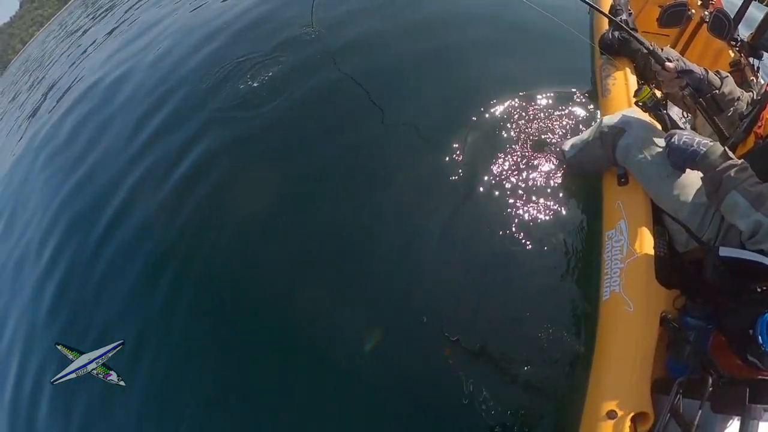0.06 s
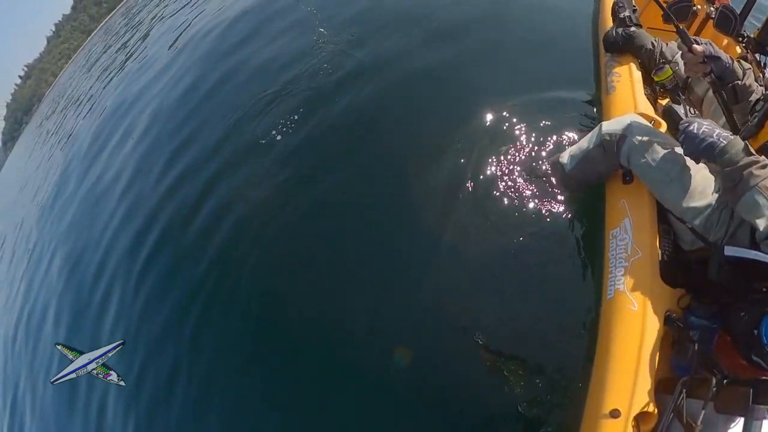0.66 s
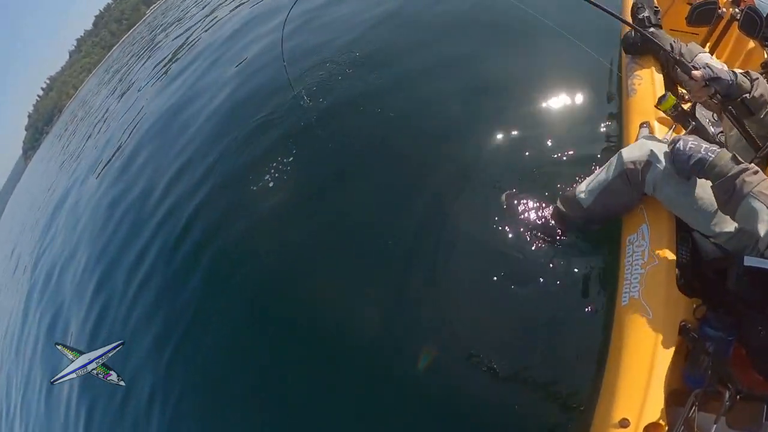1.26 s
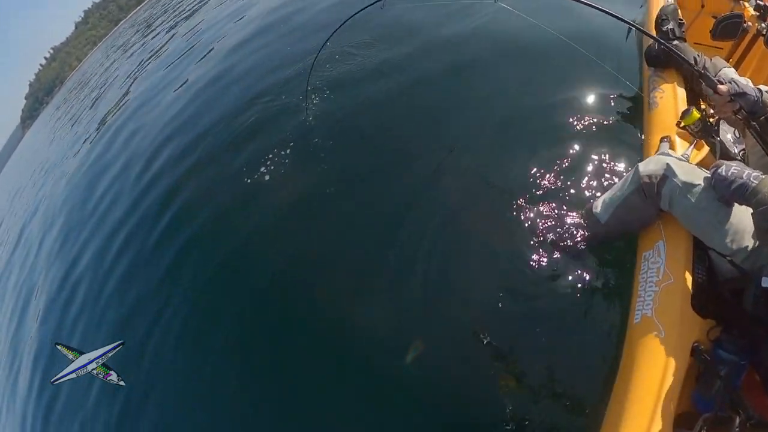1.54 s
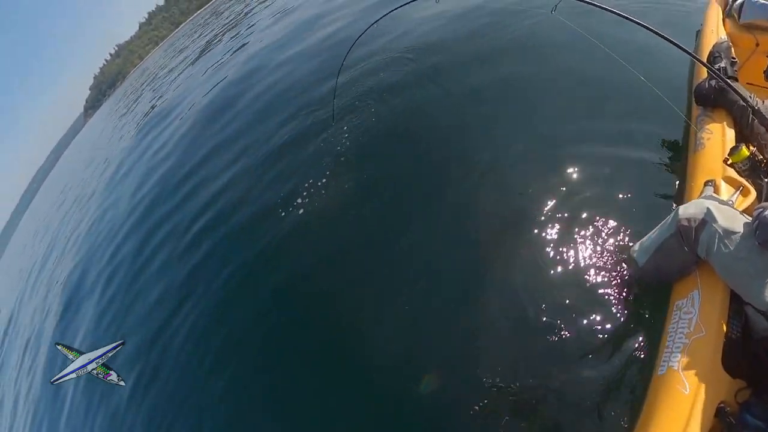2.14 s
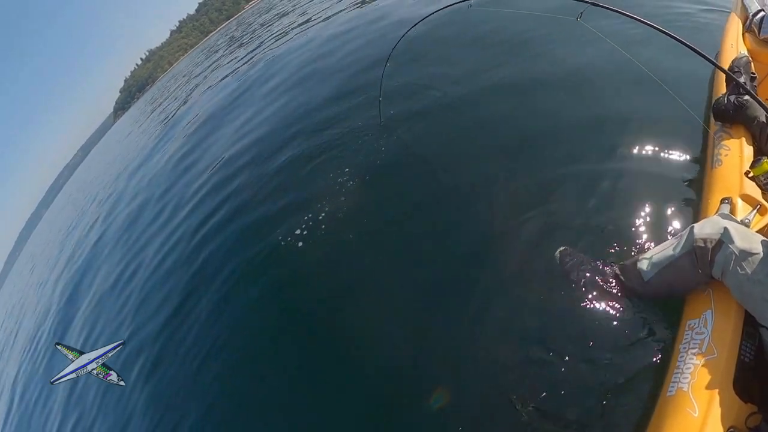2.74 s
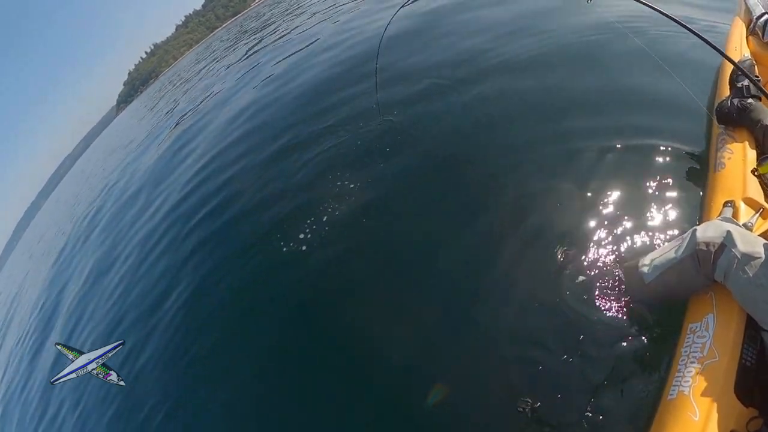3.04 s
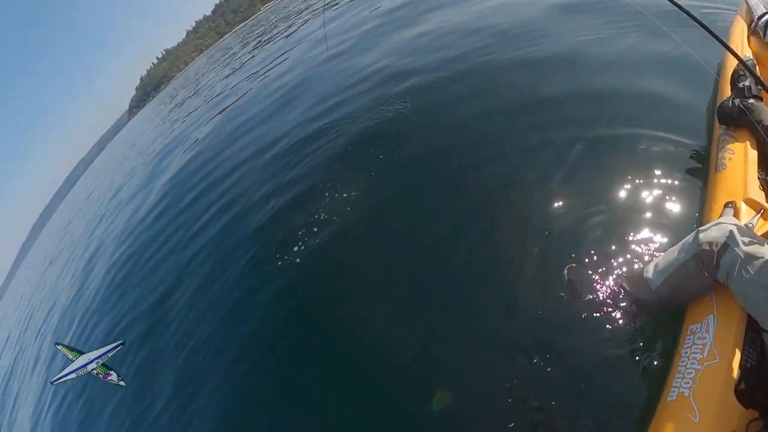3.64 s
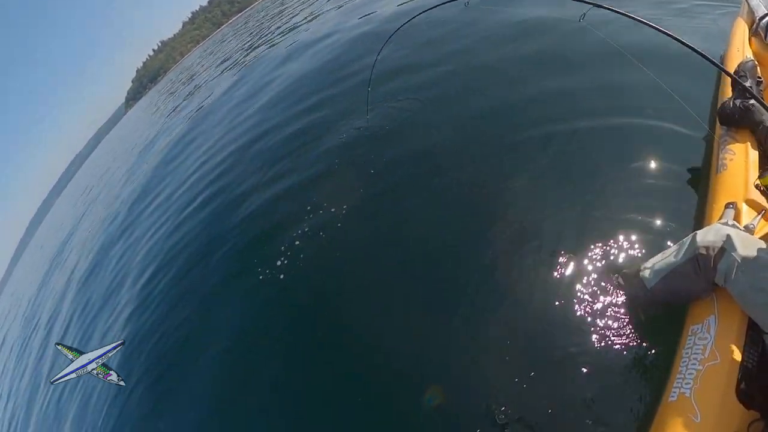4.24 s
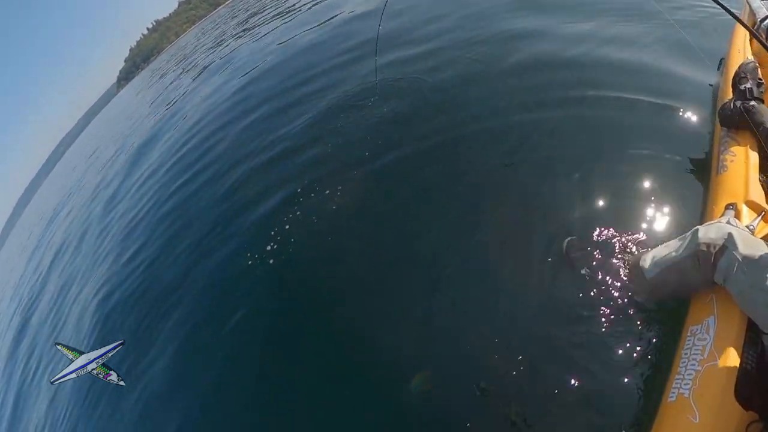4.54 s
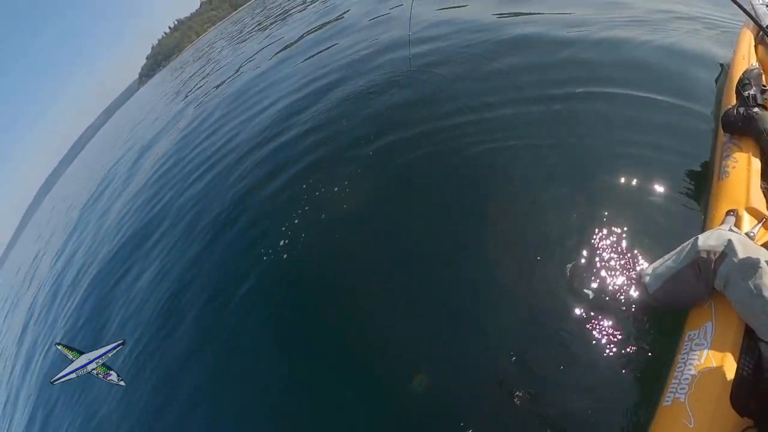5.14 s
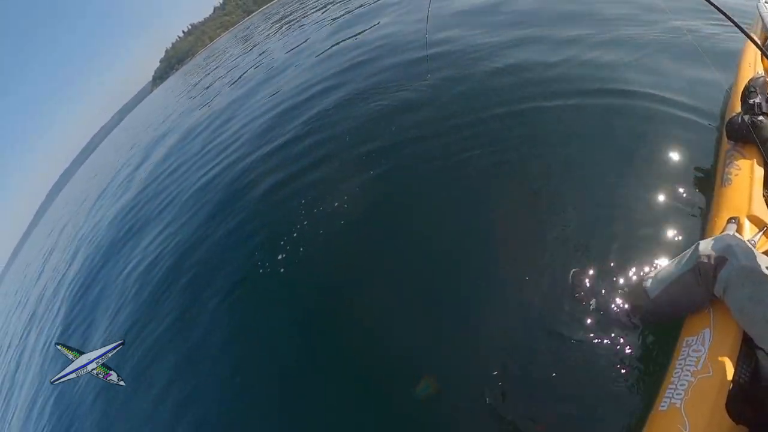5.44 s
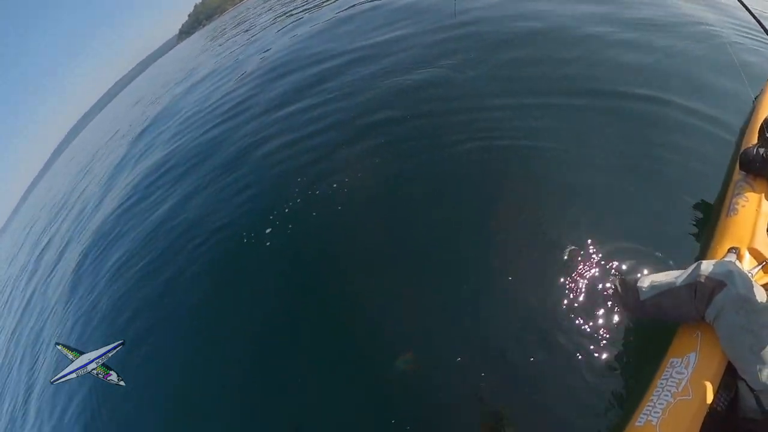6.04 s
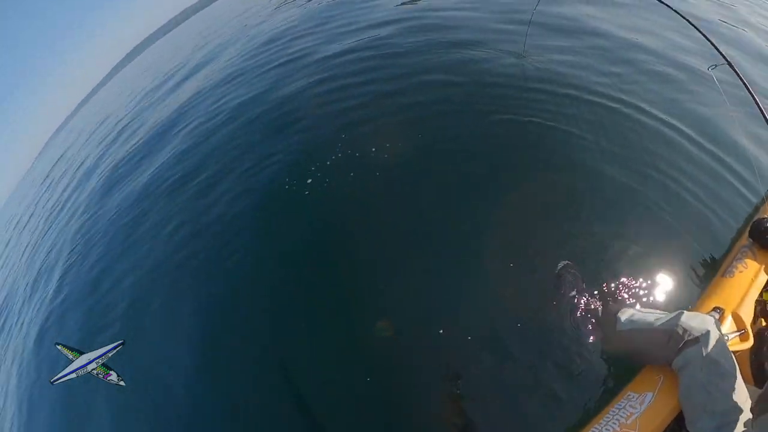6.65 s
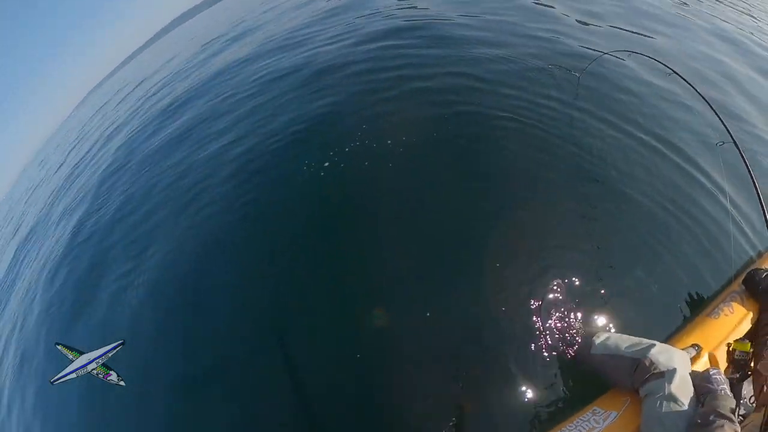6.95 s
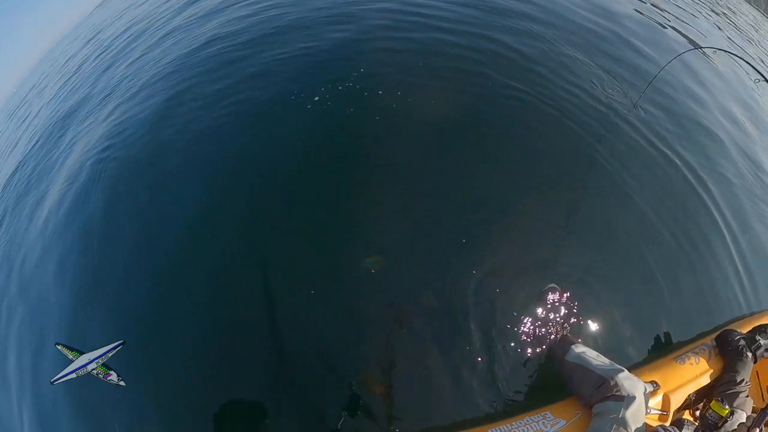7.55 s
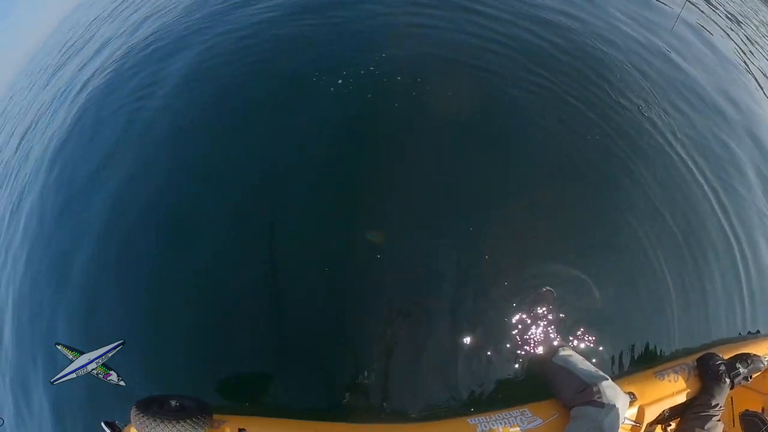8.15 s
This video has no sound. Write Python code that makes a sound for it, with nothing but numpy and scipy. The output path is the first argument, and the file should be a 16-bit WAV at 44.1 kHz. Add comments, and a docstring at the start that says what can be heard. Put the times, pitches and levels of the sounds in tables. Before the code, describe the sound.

A fishing reel's drag ratchets close by in a short tug during the first 0.4 seconds. A long run of bright metallic clicks follows from 0.9 to 3.1 seconds, rising to a buzz and slowing unevenly. After a few ticks it runs again from 3.5 to 5.4 seconds, fastest around 4, with a faint whine of strained line. Sparse ticks fill the pause before a last run from 6.7 to 7.9 seconds and a single click just after 8.

Water plops and laps against the plastic kayak around 1.3 and 7 seconds, and low gulps sound under it now and then. The hollow hull knocks dully, strongest at 1.9 seconds and softer at 6.9. A waterproof suit rustles lightly. Throughout there is a steady open-air rumble and a faint drone like a distant boat engine, with light gusts near 2 and 4 seconds and no echo.

```python
"""A plastic kayak on calm open water, a fish on the line. The reel's drag gives line in runs: a pawl
snaps over teeth, ringing spool, housing and frame, while reel and taut line whine under load.
A waterproof suit rustles. Waves wash the hollow hull, air pockets gulp under it, drops plop
and dull knocks ring its modes. Under it all: open-air rumble, a breeze and a low drone
like a far boat engine."""
import sys
import numpy as np
from scipy import signal
from scipy.fft import rfft, irfft, next_fast_len
from scipy.io import wavfile

SR = 44100
rng = np.random.default_rng(int(sys.argv[2]) if len(sys.argv) > 2 else 0)


def to_wav(sig):
    """Store sig (one row per channel, or 1-D mono) as 16-bit WAV at the path in sys.argv[1].

    Samples outside -1..1 are clipped; the rate is SR.
    """
    pcm = np.clip(np.atleast_2d(sig), -1, 1) * 32767
    pcm = np.round(pcm).astype(np.int16)
    wavfile.write(sys.argv[1], SR, pcm.T)  # frames by channels


N = 369983

# Table levels are relative within each source.
# open-air spectrum: freq_hz, level_db
AIR_SPECTRUM = [(20, -22.5), (38, -15), (65, 4.5), (120, 1.5), (160, -4), (240, -15.5), (350, -20),
                (550, -30.5), (900, -49.5), (1130, -33.5), (2200, -75), (6500, -51), (9000, -64.5),
                (15000, -84)]
# drone lines: pitch_hz, width_hz, level_db
DRONE_LINES = [(92.87, 2.34, -33.5), (180.8, 18, -56), (206.2, 16, -52.5), (268.1, 2.6, -54)]
# wind gusts: peak_s, rise_s, fall_s, level_db
GUSTS = [(2.0, 0.58, 0.63, -32), (4.1, 0.057, 0.28, -36)]
# waves along the hull: peak_s, rise_s, fall_s, level_db
WAVES = [(.93, 0.23, 0.15, -50), (1.72, 0.91, 0.77, -52.5), (6.9, 0.089, 0.087, -54),
         (7.2, 0.14, 0.13, -50.5)]
# drops: start_s, pitch_hz, level_db, fall_s, glide_octaves (per fall_s)
DRIPS = [(0.321, 2910, -36, 0.018, 0.37), (0.341, 2320, -35, 0.0095, 0.63),
         (0.472, 1640, -33.5, 0.012, -0.08), (0.474, 3090, -33.5, 0.0043, -0.73),
         (1.311, 2170, -22, 0.0074, -0.1), (1.314, 1110, -24.5, 0.0043, -0.13),
         (1.316, 365, -27, 0.047, .1), (1.332, 1540, -26, 0.029, -0.51), (1.349, 2710, -25.5, 0.0075, .4),
         (1.386, 2990, -28.5, 0.019, -1.21), (1.422, 1105, -26, 0.02, .5), (5.286, 1060, -39, 0.0175, 0.59),
         (6.813, 1020, -41, .04, 0.77), (6.914, 2600, -32, 0.011, 0.057), (7.038, 1485, -26, 0.013, 0.13),
         (7.177, 843, -46.5, 0.04, 0.43), (7.951, 2730, -32.5, 0.0066, 0.4)]
# air pockets under the hull: start_s, length_s, pitch_hz, level_db
GULPS = [(1.114, 0.057, 118.5, -18), (1.168, 0.15, 122.6, -20), (1.388, 0.086, 104, -22),
         (1.885, 0.044, 105, -10.5), (1.942, 0.076, 81.6, -15.5), (2.328, 0.04, 85, -13.5),
         (2.368, 0.094, 109, -20.5), (4.069, 0.1, 110.6, -22), (4.127, 0.122, 83, -21),
         (4.554, 0.067, 121.8, -23.5), (7.152, 0.21, 123.3, -17.5), (7.871, 0.04, 76, -17.5)]
# hull modes: freq_hz, level_db, t60_s
HULL_MODES = [(133.2, 4, 0.14), (177, -3, 0.39), (223, 4, 0.11), (292, -4.5, 0.094), (329, 2, 0.046),
              (535, -7.5, 0.18), (756, -10.5, 0.13)]
# blows on the hull: start_s, level_db, contact_cutoff_hz
KNOCKS = [(.15, -32, 610), (1.315, -37.5, 1500), (1.853, -17.5, 545), (1.8595, -20.5, 301),
          (1.8767, -22.5, 250), (6.878, -28.5, 696), (6.905, -37, 500)]
# fabric spectrum: freq_hz, level_db
FABRIC_SPECTRUM = [(300, -25), (750, -7), (1100, 6), (2000, 5.5), (3400, -1), (5200, -3), (7200, -5),
                   (8900, -20), (10800, -23.5), (13000, -32), (15500, -45)]
# arm and leg movements: peak_s, rise_s, fall_s, level_db
LIMB_STROKES = [(.15, .4, 1, -59.5), (.87, 0.076, 0.21, -41.5), (1.65, 0.98, 0.4, -51),
                (1.95, 0.043, 0.019, -49.5), (2.65, 0.65, 0.37, -58.5), (3.635, 0.083, 0.053, -47.5),
                (4.0, 0.21, 0.15, -50), (5.28, 1, 0.17, -57.5), (6.4, 0.073, 0.14, -53),
                (6.88, 0.16, 0.66, -52.5), (7.4, 0.72, 0.5, -60), (8.08, 0.044, 0.27, -53.5),
                (8.38, 0.043, .1, -51.5)]
# reel and line resonances: start_s, length_s, pitch_hz, width_hz, level_db
WHINES = [(0.031, 0.29, 1890, 160, -52.5), (1.519, 0.38, 833, 44.3, -51), (2.05, 0.71, 521, 25, -56),
          (3.56, .11, 1370, 450, -46), (3.648, 0.16, 1960, 110, -45), (3.7, 0.26, 5260, 110, -55),
          (3.923, 0.18, 1970, 130, -48)]
# single reel and tackle ticks: start_s, level_db, looseness (0-1)
TICKS = [(0.421, -38, 0), (0.601, -37, 0.16), (1.234, -30.5, 0.4), (1.315, -25.5, 0.15), (1.977, -27, .15),
         (3.103, -44, 0), (3.169, -40.5, 0.14), (3.242, -46.5, 0.84), (3.302, -39.5, 0.24),
         (3.367, -43, 0.84), (3.382, -46, 0.2), (3.443, -42.5, .6), (4.269, -38, 0.2), (5.453, -44, .3),
         (5.762, -45, 0.4), (6.12, -43, 0.4), (6.157, -42.5, .5), (6.211, -43.5, 0.4), (6.554, -51, 0.1),
         (6.675, -41, 0.05), (7.04, -34, 0.6), (8.061, -31, 0.47)]
# hand on the reel: time_s, crank_share (0-1)
CRANKING = [(.3, 0.4), (1.2, 0.4), (1.5, 0.16), (3.4, 0.15), (3.7, 0.44), (4.15, 0.52), (4.35, 0.16),
            (5.4, 0.2), (6.8, 0.17)]
# click spectra, spool free and cranked: freq_hz, level_db
FREE_SPECTRUM = [(600, -46.5), (1400, -9), (2600, -2.5), (3500, -6.5), (4600, -2), (5600, 3.5), (6500, 4.5),
                 (7300, 0.5), (8200, -7.5), (9000, -19), (10400, -17.5), (12000, -28.5), (15500, -31)]
CRANK_SPECTRUM = [(600, -38), (1500, -26), (1950, 5), (2500, -13), (3500, -6.5), (4500, 5), (5400, 7),
                  (6000, -5.5), (6900, -8), (8000, -9), (8900, -20), (10400, -20.5), (12000, -19),
                  (15500, -40)]
# metal frame and spool modes: freq_hz, level_db
FRAME_MODES = [(5480, -45), (10420, -47.5), (11900, -40)]
SPOOL_MODES = [(4450, -4.5), (4830, -5), (5380, -4), (5700, -0.5), (6060, -1.5), (6400, -0.5), (6720, 0.5),
               (7130, -1.5), (7750, -5.5)]
# housing modes: freq_hz, level_db, decay_s
HOUSING_MODES = [(1410, -32, 0.0053), (2086, -37, 0.0032), (2670, -29.5, 0.0014)]
# spool speed curves: time_s, clicks_per_s
FIRST_TUG = [(0.012, 61.0), (0.06, 16.9), (0.176, 100.5), (0.22, 48.2), (0.253, 89.9), (0.373, 24.5)]
LONG_RUN = [(0.87, 29.6), (0.948, 97.6), (1.012, 178.8), (1.169, 213.6), (1.236, 99.0), (1.302, 139.7),
            (1.396, 67.8), (1.569, 73.3), (1.634, 129.8), (1.828, 180.5), (1.874, 137.0), (1.978, 164.6),
            (2.057, 119.0)]
HARD_PULL = [(3.524, 39.8), (3.601, 128.5), (3.663, 172.1), (3.704, 71.8), (3.795, 48.7), (3.843, 173.3),
             (3.889, 96.6), (3.977, 200.4), (4.032, 234.4), (4.173, 170.2), (4.274, 23.0)]
STEADY_RUN = [(4.295, 45.4), (4.356, 97.3), (4.445, 129.7), (4.588, 90.3), (4.715, 125.5), (4.784, 109.0),
              (4.868, 158.9), (5.029, 160.1), (5.149, 115.4), (5.271, 70.2), (5.412, 34.0)]
LAST_RUN = [(6.7, 73.1), (6.764, 64.7), (6.825, 203.5), (6.893, 209.3), (6.94, 67.6), (6.975, 48.6),
            (7.088, 123.7), (7.131, 60.4), (7.204, 59.3), (7.28, 95.1), (7.344, 165.2), (7.496, 203.1),
            (7.637, 124.4), (7.776, 68.2), (7.857, 10.5)]
# runs of the drag: speed_curve, level_db, spool_pitch_ratio, ring_gain, ridge_turns, sweep_hz_per_turn,
# ridge_db, housing_peak_turns, whistle_hz, whistle_db, whistle_decay_s
DRAG_RUNS = [(FIRST_TUG, -34, 0.89, 0.06, 0.12, -2700, 3.7, 0.2, 2200, -23, 0.002),
             (LONG_RUN, -37, 0.98, 0.19, .05, 1740, 5, 0.21, 2500, -29, .001), ([(2.059, 114.5),
             (2.215, 98.2), (2.491, 112.4), (2.543, 147.4), (2.607, 120.7), (2.686, 156.9), (2.716, 124.0),
             (2.849, 145.2), (2.897, 52.7), (2.936, 76.9), (3.044, 73.1), (3.108, 42.0)],
             -38, 0.96, 0.19, 0.834, -2800, 6.6, .02, 2700, -36, 0.0009),
             (HARD_PULL, -35.5, 0.94, 0.18, 0.33, 1620, 5.5, 0.41, 3250, -22, 0.0011),
             (STEADY_RUN, -37, 1.0, 0.18, 0.63, -2500, 5.5, 0.54, 2650, -23, .0011),
             (LAST_RUN, -38.5, 0.9, 0.16, 0.29, -2700, 2.6, 0.21, 2165, -27, 0.0088)]


def from_db(db):
    """Decibels to gain."""
    return 10 ** (np.asarray(db) / 20)


def unit_rms(x):
    """Scale to rms 1."""
    return x / np.sqrt(np.mean(x ** 2) + 1e-20)


def add(out, start_s, sound):
    """Mix a sound in at start_s."""
    at = int(np.clip(start_s * SR, 0, N - 1))
    out[at:at + len(sound)] += sound[:N - at]


def impulses(times_s, gains):
    """One-sample kicks."""
    return np.bincount(np.clip(times_s * SR, 0, N - 1).astype(int), gains, N)


def coloured(x, spectrum, size=8192):
    """Minimum-phase filter, given spectrum, unit energy."""
    hz, db = np.transpose(spectrum)
    grid_hz = np.maximum(np.arange(size // 2 + 1) * SR / size, 1)
    grid_db = np.interp(np.log(grid_hz), np.log(hz), db)
    cepstrum = irfft(np.log(from_db(grid_db)))
    cepstrum[1:size // 2] *= 2
    cepstrum[size // 2 + 1:] = 0
    response = irfft(np.exp(rfft(cepstrum)))
    return signal.oaconvolve(x, response / np.linalg.norm(response))[:N]


def band(x, low_hz, high_hz):
    """Band-pass."""
    return signal.sosfilt(signal.butter(2, [low_hz, high_hz], "band", fs=SR, output="sos"), x)


def fade(kicks, decay_s):
    """Exponential tail on each kick."""
    return signal.lfilter([1], [1, -np.exp(-1 / (decay_s * SR))], kicks + 1e-18)


def drift(rate_hz):
    """Low-passed noise, rms 1."""
    size = next_fast_len(N, real=True)
    hz = np.arange(size // 2 + 1) * SR / size
    spectrum = rfft(rng.standard_normal(size)) / (1 + (hz / rate_hz) ** 2)
    return unit_rms(irfft(spectrum, size)[:N])


def swells(rows, rest_db):
    """Gain curve: a floor plus lopsided bells, summed in power."""
    power = from_db(rest_db) ** 2
    for peak_s, rise_s, fall_s, level_db in rows:
        t = np.arange(N) / SR - peak_s
        width_s = np.where(t < 0, rise_s, fall_s)
        bell = np.exp(-np.minimum((t / width_s) ** 2, 50))
        power += (from_db(level_db) * bell) ** 2
    return np.sqrt(power)


def open_air(level_db=-34):
    """Steady rumble over the water."""
    return from_db(level_db) * coloured(rng.standard_normal(N), AIR_SPECTRUM)


def drone(waver=0.46):
    """Low lines wavering in level and phase, like a far engine."""
    out, t = np.zeros(N), np.arange(N) / SR
    for hz, width_hz, level_db in DRONE_LINES:
        phasor = unit_rms(1 + waver * drift(width_hz)) + 1j * waver * drift(width_hz)
        out += from_db(level_db) * (phasor * np.exp(2j * np.pi * hz * t)).real
    return out


def breeze(calm_db=-45):
    """Wind buffets the microphone in gusts."""
    return swells(GUSTS, calm_db) * unit_rms(band(rng.standard_normal(N), 24, 76))


def wash(gain_db=-1, calm_db=-58, lumpy_db=2.2):
    """Small waves lap unevenly along the hull."""
    lapping = band(rng.standard_normal(N), 240, 700) * from_db(lumpy_db * drift(22))
    return from_db(gain_db) * swells(WAVES, calm_db) * unit_rms(lapping)


def gurgles(gain_db=4.5, low_hz=380, high_hz=1400, count=300, cycles=20, rise_octaves=0.45):
    """Waves fold in small bubbles that swell, glide up and fade."""
    out = np.zeros(N)
    for when, smallness, strength in rng.random((count, 3)):
        hz = low_hz * (high_hz / low_hz) ** smallness
        life = np.linspace(0, 1, int(cycles / hz * SR))
        phase = 2 * np.pi * np.cumsum(hz * 2 ** (rise_octaves * life)) / SR
        add(out, when * N / SR, strength * np.sin(np.pi * np.sqrt(life)) * np.sin(phase))
    return from_db(gain_db) * swells(WAVES, -np.inf) * out


def drips(attack_s=0.00053, fall_db=22, spray_gain=0.41, spray_s=0.017, spray_hz=(740, 5100)):
    """Each drop sprays briefly and leaves a wobbling, gliding bubble."""
    bubbles, spray_envelope = np.zeros(N), np.zeros(N)
    wobble = 1 + 0.067 * drift(250)
    for start_s, hz, level_db, fall_s, octaves in DRIPS:
        t = np.arange(int(2 * fall_s * SR)) / SR
        pitch_hz = hz * 2 ** (octaves * t / fall_s) * wobble[int(start_s * SR):][:len(t)]
        envelope = from_db(level_db - fall_db * t / fall_s) * (1 - np.exp(-t / attack_s))
        add(bubbles, start_s, envelope * np.sin(2 * np.pi * np.cumsum(pitch_hz) / SR))
        add(spray_envelope, start_s, envelope * np.exp(-t / spray_s))
    hiss = unit_rms(band(band(rng.standard_normal(N), *spray_hz), *spray_hz))
    return bubbles + spray_gain * spray_envelope * hiss


def gulps(overtone_db=-22, sag_share=0.142):
    """Trapped air swells and fades; pitch sags as the pocket changes size."""
    out = np.zeros(N)
    wobble = 1 + 0.2 * drift(19)
    for start_s, length_s, hz, level_db in GULPS:
        life = np.linspace(0, 1, int(length_s * SR))
        phase = 2 * np.pi * np.cumsum(hz * (1 - sag_share * life)) / SR
        arch = np.sin(np.pi * life)
        tone = np.sin(phase) + from_db(overtone_db) * arch * np.sin(2 * phase)
        add(out, start_s, from_db(level_db) * arch * tone)
    return out * wobble


def hull_knocks(press_s=0.0021):
    """Blows ring the hull; soft contact builds gradually and weakens high modes."""
    out, t = np.zeros(N), np.arange(SR // 2) / SR
    hz, mode_db, t60_s = np.transpose(HULL_MODES)[:, :, None]
    envelopes = np.exp(-np.log(1000) * t / t60_s) * (1 - np.exp(-t / press_s))
    rings = envelopes * np.sin(2 * np.pi * hz * t)
    for start_s, level_db, cutoff_hz in KNOCKS:
        strength = from_db(level_db + mode_db) / (1 + (hz / cutoff_hz) ** 2)
        add(out, start_s, np.sum(strength * rings, axis=0))
    return out


def suit(gain_db=2, rest_db=-70.5, grain_db=2.4, grain_hz=200):
    """Stiff fabric slides in many tiny slips."""
    slips = unit_rms(rng.standard_normal(N) * from_db(grain_db * drift(grain_hz)))
    return from_db(gain_db) * swells(LIMB_STROKES, rest_db) * coloured(slips, FABRIC_SPECTRUM)


def whines():
    """Friction under load drives a narrow, rough resonance that swells and fades."""
    out = np.zeros(N)
    for start_s, length_s, hz, width_hz, level_db in WHINES:
        radius = np.exp(-np.pi * width_hz / SR)
        resonator = [1, -2 * radius * np.cos(2 * np.pi * hz / SR), radius ** 2]
        friction = band(rng.standard_normal(SR), hz / np.sqrt(2), hz * np.sqrt(2))
        ring = signal.lfilter([1], resonator, friction)[-int(length_s * SR):]
        arch = np.sin(np.linspace(0, np.pi, len(ring)))
        add(out, start_s, from_db(level_db) * unit_rms(ring) * arch)
    return out


def pawl(times_s, gains, chatter_gain=0.14, chatter_s=0.0044):
    """The pawl snaps onto a tooth, then chatters."""
    kicks = impulses(times_s, gains)
    return kicks + chatter_gain * fade(kicks, chatter_s) * rng.standard_normal(N)


def ticks(gain_db=12, rattle_db=-14, rattle_s=0.011):
    """Firm ticks snap; loose ones mostly rattle."""
    times_s, level_db, looseness = np.transpose(TICKS)
    gains = from_db(level_db + gain_db)
    snaps = pawl(times_s, gains * (1 - looseness))
    rattle = fade(impulses(times_s, gains * looseness), rattle_s) * rng.standard_normal(N)
    return snaps + from_db(rattle_db) * rattle


def drag_run(speed_curve, level_db, pitch_ratio, ring_gain, ridge_turns, sweep_hz_per_turn, ridge_db,
             housing_peak_turns, whistle_hz, whistle_db, whistle_decay_s):
    """One click per tooth rings spool and housing; both rings vary with spool angle."""
    teeth, jitter_s, uneven_db = 15, 0.00012, 1.2
    doubling_db, stall_db, slow_per_s = 1.8, -3, 40
    ring_s, build_s, spread_db, middle_hz, housing_swell_db = 0.0011, 0.0004, 2, 6000, 4
    t = np.arange(N) / SR
    clicks_per_s = np.interp(t, *np.transpose(speed_curve), left=0, right=0)
    teeth_passed = np.cumsum(clicks_per_s) / SR
    at = np.flatnonzero(np.diff(np.ceil(teeth_passed))) + 1
    rate_per_s, turns = clicks_per_s[at], teeth_passed[at] / teeth
    chance = rng.standard_normal((len(at), 2 + len(SPOOL_MODES)))
    phases = rng.uniform(0, 2 * np.pi, (len(at), len(SPOOL_MODES), 1))
    times_s = at / SR + jitter_s * chance[:, 0]
    speed_db = doubling_db * np.log2(rate_per_s / rate_per_s.mean())  # faster is louder
    speed_db += stall_db * np.clip(1 - rate_per_s / slow_per_s, 0, 1)
    gains = from_db(level_db + speed_db + uneven_db * chance[:, 1])
    out = pawl(times_s, gains)

    age_s = t[t < 0.022]
    mode_hz, mode_db = np.transpose(SPOOL_MODES)[:, :, None]
    spool_hz = pitch_ratio * mode_hz
    crest_turns = ridge_turns + (spool_hz - middle_hz) / sweep_hz_per_turn
    envelope = ring_gain * np.exp(-age_s / ring_s) * (1 - np.exp(-age_s / build_s))
    housing = sum(from_db(db) * np.cos(2 * np.pi * hz * age_s) * np.exp(-age_s / decay_s)
                  for hz, db, decay_s in [*HOUSING_MODES, (whistle_hz, whistle_db, whistle_decay_s)])
    for start_s, gain, turn, scatter, phase in zip(times_s, gains, turns, chance[:, 2:, None], phases):
        ridges = np.cos(4 * np.pi * (turn - crest_turns))  # strong modes sweep by twice a turn
        strength = from_db(mode_db + ridge_db * ridges + spread_db * scatter)
        spool = envelope * np.sum(strength * np.sin(2 * np.pi * spool_hz * age_s + phase), axis=0)
        housing_gain = from_db(housing_swell_db * np.cos(2 * np.pi * (turn - housing_peak_turns)))
        add(out, start_s, gain * (spool + housing_gain * housing))
    return out


def reel(drag_gain_db=8.5, frame_ring_s=0.006):
    """Clicks pass through the body; cranking lowers their colour, the metal frame rings on."""
    crank = np.interp(np.arange(N) / SR, *np.transpose(CRANKING))
    clicks = from_db(drag_gain_db) * sum(drag_run(*run) for run in DRAG_RUNS) + ticks()
    body = (1 - crank) * coloured(clicks, FREE_SPECTRUM) + crank * coloured(clicks, CRANK_SPECTRUM)
    age_s = np.arange(SR // 20) / SR
    frame = sum(from_db(db) * np.cos(2 * np.pi * hz * age_s) for hz, db in FRAME_MODES)
    frame *= np.exp(-age_s / frame_ring_s)
    return body + signal.oaconvolve(body, frame)[:N]


def scene():
    """Mono mix in the open, no echo."""
    angler = reel() + whines() + suit()
    hull_and_water = gulps() + hull_knocks() + drips() + wash() + gurgles()
    background = open_air() + drone() + breeze()
    return (background + hull_and_water + angler)[None]


def record(dry, low_hz=16, high_hz=15800):
    """Cut the deepest rumble and the top."""
    thinned = signal.sosfilt(signal.butter(2, low_hz, "high", fs=SR, output="sos"), dry)
    return signal.sosfilt(signal.ellip(10, 0.1, 80, high_hz, fs=SR, output="sos"), thinned)


dry = scene()
out = record(dry)
to_wav(out)
```